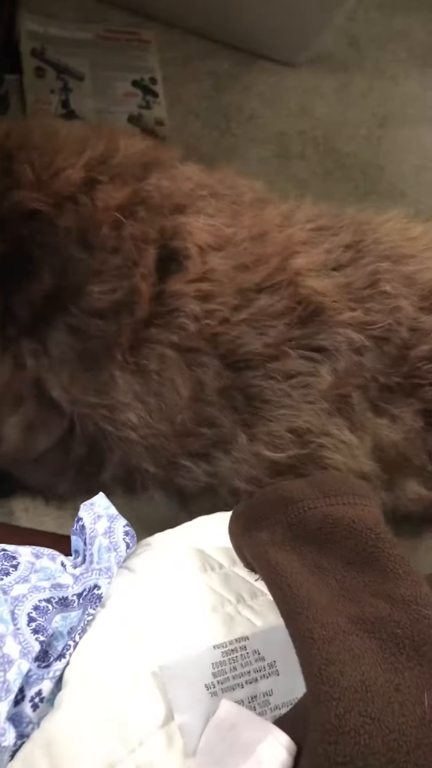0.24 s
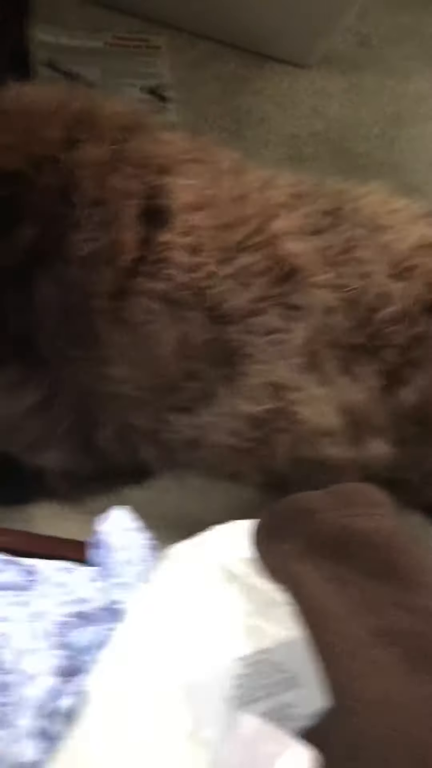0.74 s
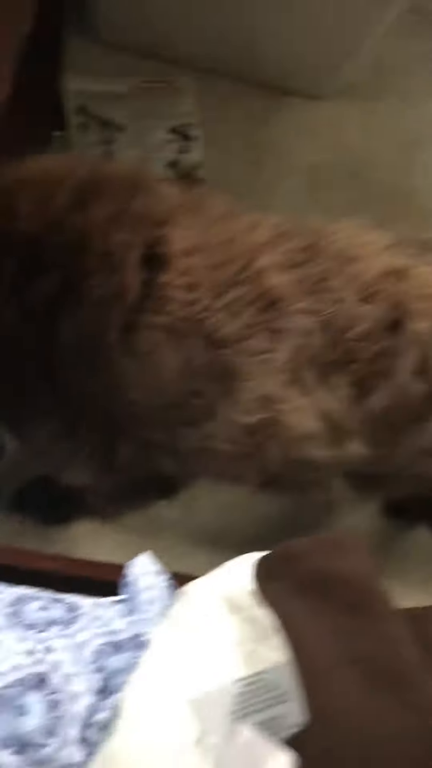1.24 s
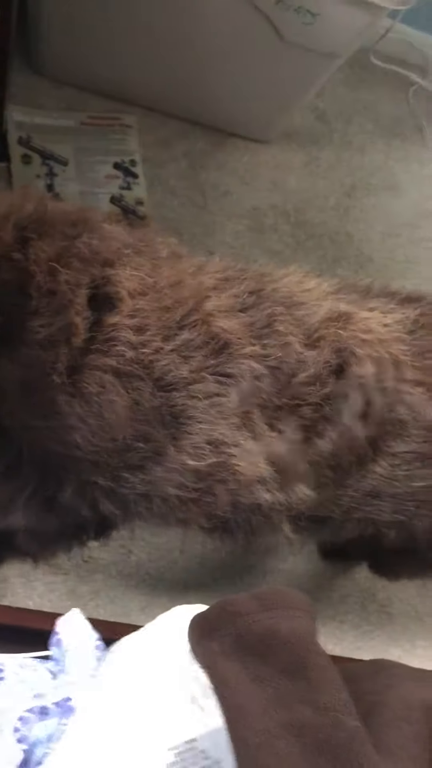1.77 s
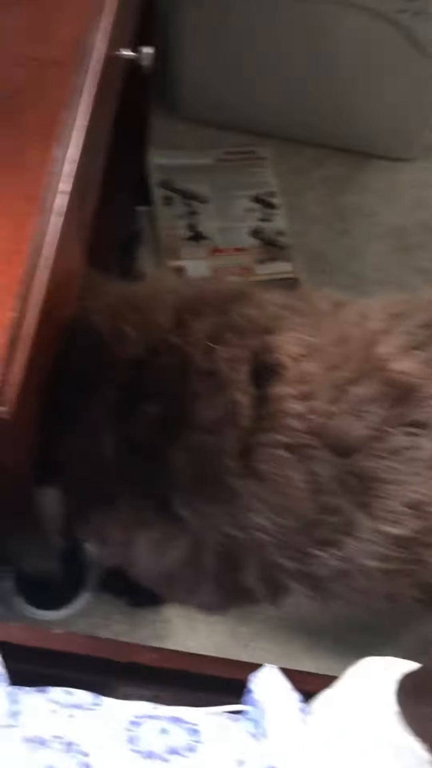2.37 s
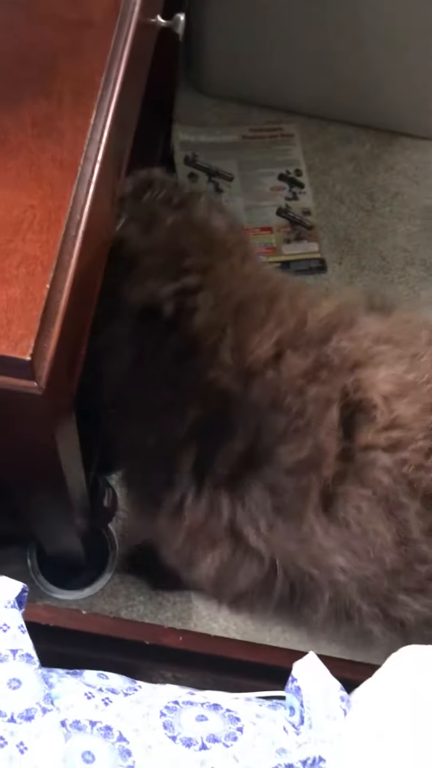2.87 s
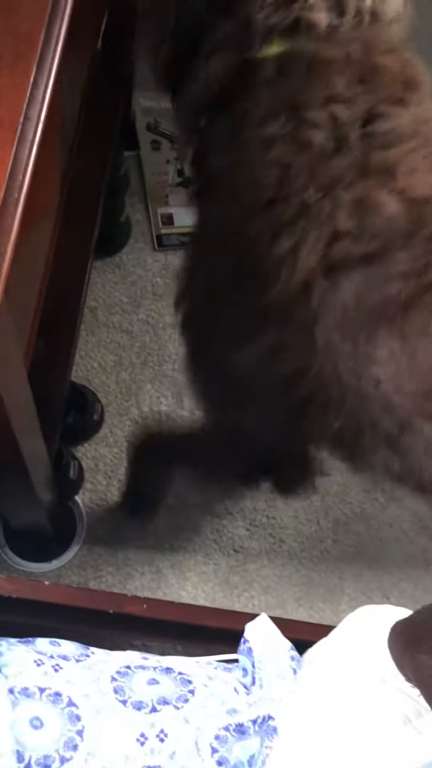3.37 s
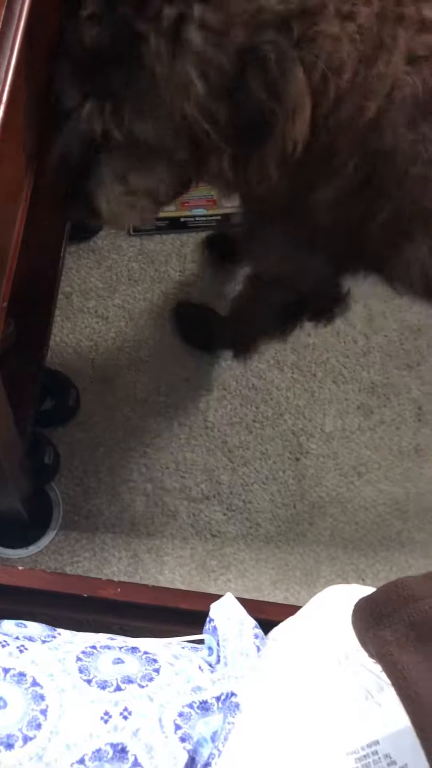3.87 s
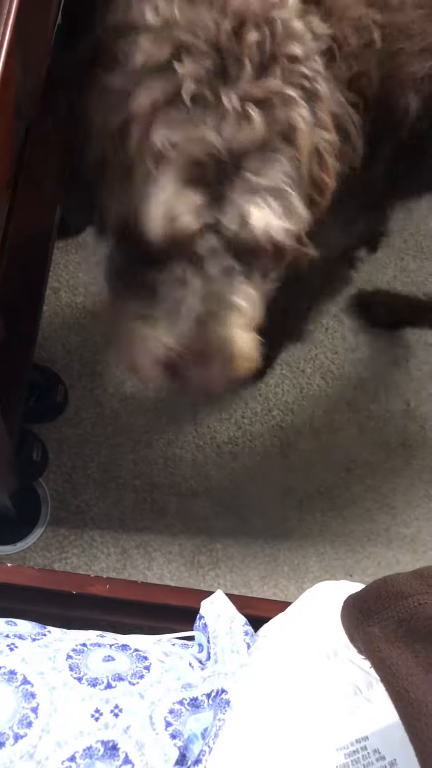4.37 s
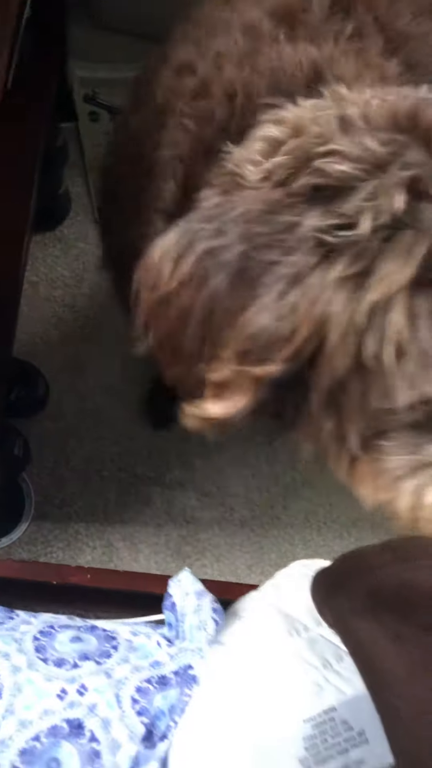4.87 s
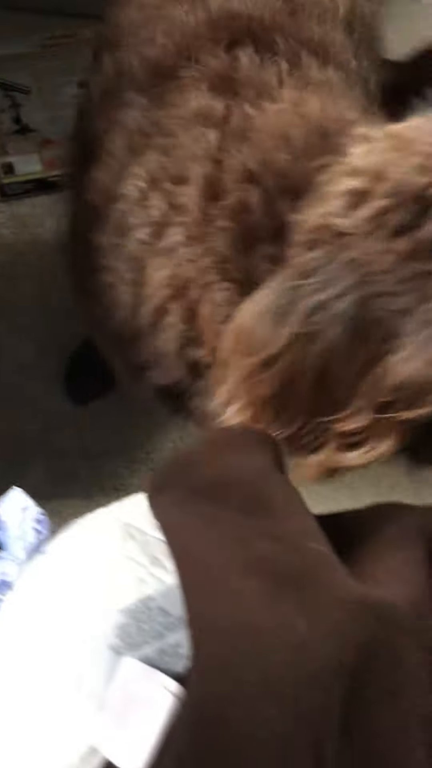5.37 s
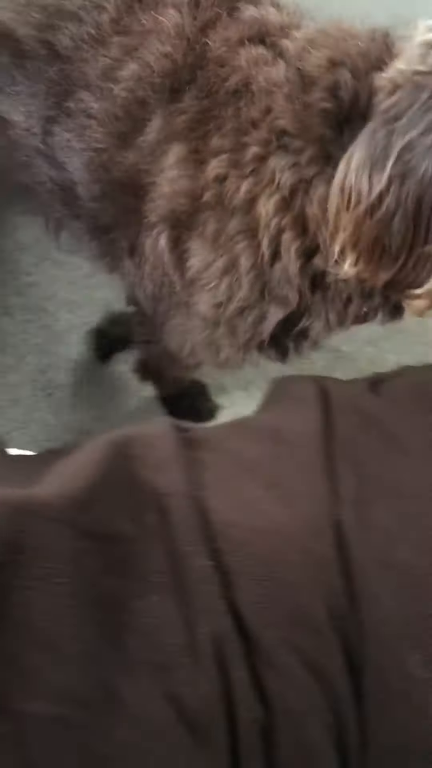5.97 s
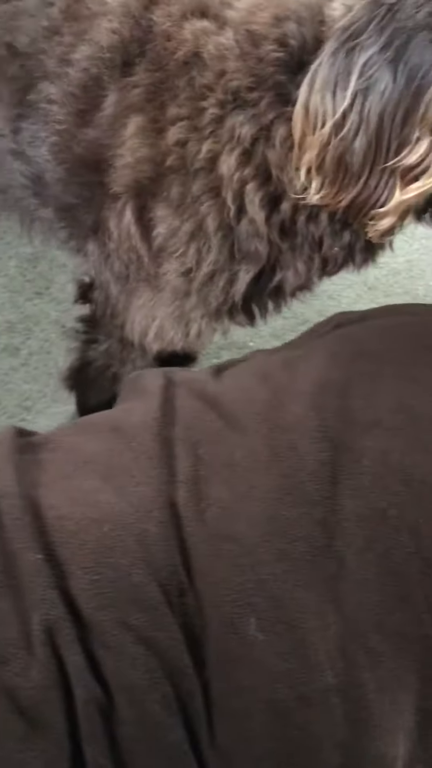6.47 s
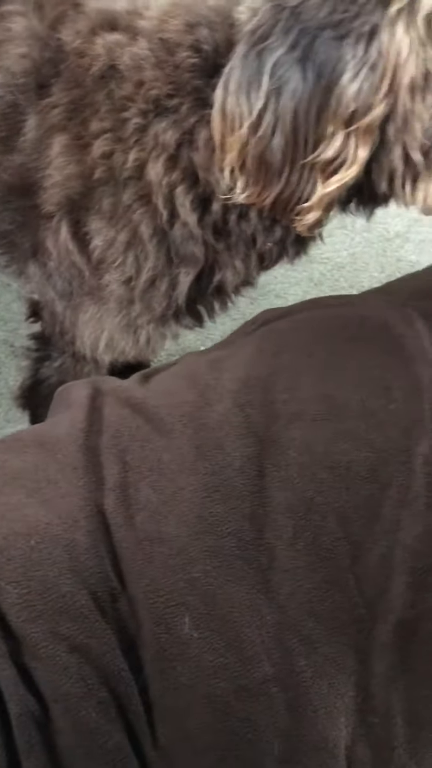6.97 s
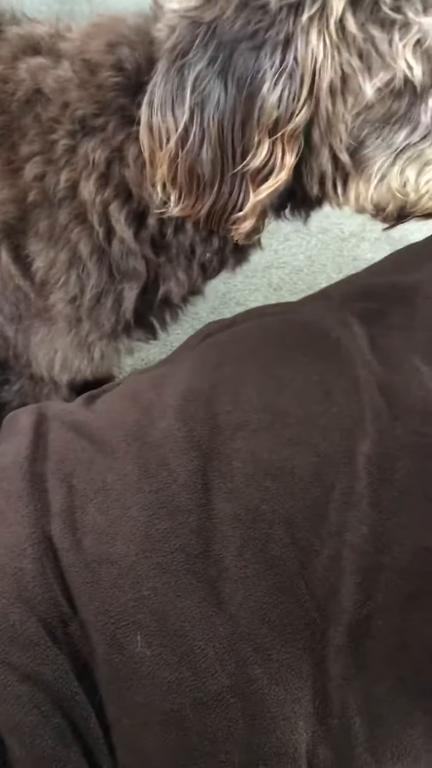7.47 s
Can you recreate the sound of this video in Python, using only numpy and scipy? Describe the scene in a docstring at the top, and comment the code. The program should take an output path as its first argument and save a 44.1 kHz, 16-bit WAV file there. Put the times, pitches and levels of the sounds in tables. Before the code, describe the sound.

A quiet carpeted bedroom with faint still air and a barely audible, wavering low drone; a puppy is close to the microphone. The tail of a thin, high whimper fades by 0.15 s, followed by a soft nose puff. A weak airy whine comes at 0.4-0.6 s, then a puff, a faint sniff and dull paw thuds around 1 s, with lighter ones later. At 2.1-2.5 s a purer whistling whine slides downward. Short whimpers follow at 2.7, 3.1 and 3.5 s, the second a steeply falling yelp, with tiny squeaks, nose puffs and carpet brushing. At 3.94 s a loud, piercing, raspy cry drops quickly into a long trembling whine lasting until 5.7 s, with a low voiced moan swelling beneath until about 5.2 s. A soft shuffle, then a gentler bending whine at 6.0-6.5 s with a sniff and wet mouth ticks. A very faint squeak at 7 s, then quiet.

```python
"""A puppy whines close to the microphone in a quiet carpeted bedroom: thin sliding nasal whistles, a falling yelp,
then a sharp cry that settles into a long whine. Whistles are harmonics on moving pitches, with hiss and rasp
from the same airflow; in the long whine the vocal folds hum a second, lower note under the whistle.
Small nose puffs of shaped noise end the cries, paws step and shuffle on the carpet as damped and swelling
noise, and a faint low drone wavers behind everything."""
import sys
import numpy as np
from scipy import signal
from scipy.fft import rfft, irfft, next_fast_len
from scipy.io import wavfile
from scipy.ndimage import map_coordinates

SR = 44100
rng = np.random.default_rng(int(sys.argv[2]) if len(sys.argv) > 2 else 0)


def int16_out(signal):
    """Quantize to a 16-bit WAV file."""
    q = np.round(np.clip(np.atleast_2d(signal).T, -1, 1) * 32767)
    wavfile.write(sys.argv[1], SR, q.astype(np.int16))


N = 340893
TIME = np.arange(N) / SR


def amp(db):
    """Decibels to gain."""
    return 10 ** (np.asarray(db) / 20)


def unit(x):
    """Scale to rms 1."""
    return x / np.sqrt(np.mean(x ** 2) + 1e-20)


def along(points, hz):
    """Read (frequency_hz, value) points on a log frequency axis."""
    f, v = np.transpose(points)
    return np.interp(np.log(hz + 1), np.log(f + 1), v)


def curves(rows, t):
    """Each column after the time, at the times t."""
    s, *cols = np.transpose(rows)
    return [np.interp(t, s, c) for c in cols]


def wobble(rate, t):
    """A random curve through rate knots a second."""
    knots = rng.standard_normal(int(N * rate / SR) + 4)
    return map_coordinates(knots, [t * rate], mode="nearest")


def filtered(x, response):
    """x times a response of frequency."""
    m = next_fast_len(N + SR // 2)
    return irfft(rfft(x, m) * response(np.fft.rfftfreq(m, 1 / SR)), m)[:N]


def noise(colour):
    """Coloured noise of rms 1."""
    return unit(filtered(rng.standard_normal(N), lambda hz: amp(along(colour, hz))))


def resonance(modes, hz):
    """Summed gain, at the frequencies hz, of resonances whose width is taken at half gain."""
    return sum(amp(db) / (1 + (2 * (hz - centre) / width) ** 2) for centre, width, db in modes)


def resonant_noise(modes, stretch=1):
    """Noise of rms 1 shaped by resonances, whose frequencies are multiplied by stretch."""
    return unit(filtered(rng.standard_normal(N), lambda hz: resonance(modes, hz / stretch)))


def gate(t, start, end, edge=0.0028):
    """Open from start to end, with soft edges."""
    return np.sin(np.pi / 2 * np.clip(np.minimum(t - start, end - t) / edge + .5, 0, 1)) ** 2


def sounding(start, end):
    """The samples that a cry covers, their times, and its gate."""
    opening = gate(TIME, start, end)
    span = np.flatnonzero(opening)
    return span, TIME[span], opening[span]


def swell(start, length):
    """A rounded rise and fall."""
    return np.sin(np.pi * np.clip((TIME - start) / length, 0, 1))


def tone(hz, harmonics):
    """Harmonics (number, rms dB) on a moving pitch."""
    phase = 2 * np.pi * np.cumsum(hz) / SR
    return np.sqrt(2) * sum(amp(db) * np.sin(k * phase) * (k * hz < SR / 2) for k, db in harmonics)


def swishes(rows, air):
    """Short bell-shaped swells of a noise, made grainy."""
    level = sum(amp(db) * np.exp(-.5 * ((TIME - s) / width) ** 2) for s, width, db in rows)
    grain = amp(2.5 * wobble(250, TIME))
    return level * unit(air * grain)


def taps(rows, decay_s, modes):
    """Small contacts that start sharply and are damped at once."""
    blows = sum(amp(db) * (TIME >= s) * np.exp(-np.abs(TIME - s) / decay_s) for s, db in rows)
    return blows * resonant_noise(modes)


# the low drone's course, about which it wavers: time_s, pitch_hz, level_db
DRONE = [(0, 116, -72), (1.3, 121, -58), (1.7, 121, -58), (2, 118, -69), (3.5, 100, -65), (6.7, 123, -60),
         (7.3, 128, -67)]
# the low rumble's course: time_s, level_db
RUMBLE_LEVEL = [(2.4, -88), (3.4, -60), (4.4, -65.5), (6.5, -59.5), (7.7, -70.5)]
# colours of the rumble and of the still air: frequency_hz, relative_db
RUMBLE = [(25, -10), (75, 0.5), (220, -20), (1000, -72.5)]
QUIET = [(20, -24.5), (59, -8.5), (130, -13.5), (156, -19.5), (1050, -33), (15500, -47)]


def background(floor_db=-64):
    """Still room air as steady coloured noise, with a low wavering drone and a soft rumble."""
    hz, db = curves(DRONE, TIME)
    hz = hz * (1 + .012 * wobble(4, TIME))
    drone = tone(hz, [(1, db + 1.5 * wobble(2.5, TIME))])
    rumble = amp(curves(RUMBLE_LEVEL, TIME)[0]) * noise(RUMBLE)
    return drone + rumble + amp(floor_db) * noise(QUIET)


# how the snout colours the whistle's overtones: frequency_hz, gain_db
SNOUT = [(6400, -1.5), (7400, -10), (8500, -11.5), (11700, -9.5), (14000, -23)]
# resonances of the nasal passages: frequency_hz, width_hz, gain_db
NASAL = [(208.7, 250, 4), (1048, 750, 1), (2236, 340, -3), (3290, 830, 7), (4210, 402, 3.5),
         (5690, 1830, 2), (9220, 1410, -5), (12080, 2300, -5)]
# resonances of the throat, before any stretch: frequency_hz, width_hz, gain_db
THROAT = [(600, 160, -5), (1166, 149, 0.5), (1618, 140, 1.5), (2118, 198.3, -9), (2430, 189.4, -7),
          (13100, 3630, -16)]
# spread of the slow and fast unsteadiness of pitch (shares), and of level (dB)
RIPPLE, JITTER, FLUTTER_DB = .0035, 0.00271, 1.4
PURE_FLOW_DB = -15  # a pure whistle needs less air than one rich in overtones


def whistle(cries, hiss_db, rasp_db=-35, fades_db=0, stretch=1, lag_s=0.021):
    """Air whistles in the narrowed airway with trembling pitch and strength; the same flow hisses and rasps.
    A less open mouth (stretch under 1) lowers the throat's resonances."""
    def flutter(t):
        """Each harmonic trembles on its own, and fades as if by echoes where fades_db is set."""
        return FLUTTER_DB * wobble(140, t) - fades_db * np.maximum(wobble(30, t), 0) ** 2

    out, flow = np.zeros(N), np.zeros(N)
    for span, opening, hz, (first, second, third) in cries:
        t = TIME[span]
        hz = hz * (1 + RIPPLE * wobble(30, t) + JITTER * wobble(500, t))
        # the fourth and fifth harmonics follow the third through the snout
        highest = [third + along(SNOUT, k * hz) - along(SNOUT, 3 * hz) for k in (4, 5)]
        levels = [first, second, third] + highest
        out[span] += opening * tone(hz, [(k, db + flutter(t)) for k, db in enumerate(levels, 1)])
        flow[span] += opening * (amp(first + PURE_FLOW_DB) + amp(second) + amp(third))
    step = 1 / (lag_s * SR)
    flow = signal.lfilter([step], [1, step - 1], flow)  # turbulence builds and dies just after the tone
    eddies = amp(2 * wobble(90, TIME))
    hiss = amp(hiss_db) * np.sqrt(flow) * resonant_noise(NASAL)  # grows more slowly than the flow
    rasp = amp(rasp_db) * flow * resonant_noise(THROAT, stretch)  # stands out in hard cries
    return out + eddies * (hiss + rasp)


def held(rows):
    """A held cry follows its own course of pitch and strength."""
    span, t, opening = sounding(rows[0][0], rows[-1][0])
    hz, *levels = curves(rows, t)
    return span, opening, hz, levels


SAG, SAG_S = 0.038, 0.011  # share by which the pitch drops as the air runs out, and its time constant
FALTER, FALTER_S = 0.0296, .025  # spread of pitch unsteadiness at the end (share), and its time constant
ATTACK_DB, ATTACK_S = 4, 0.011  # depth and time constant of the swell at the start
RELEASE_DB, RELEASE_S = 9.5, 0.0049  # and of the fall at the end
FIRST_SWING_S = 0.058  # from the start to the first level swell (or dip, where the swing is negative)
THIRD_FADE_DB = -12.5  # change of the third harmonic over a cry: the whistle dulls


def whimper(start, length, first_hz, last_hz, arch_hz, db, fade_db, swing_rate, swing_db, second_db, third_db):
    """A short cry slides along an arch, then sags and falters, while its level swells and dips as if by echoes."""
    span, t, opening = sounding(start, start + length)
    age, left = t - start, start + length - t
    u = age / length
    hz = first_hz + (last_hz - first_hz) * u + arch_hz * (1 - (2 * u - 1) ** 2)
    falter = FALTER * np.exp(-left / FALTER_S) * wobble(400, TIME[:len(t)])
    hz = hz * (1 - SAG * np.exp(-left / SAG_S) + falter)
    edges = -ATTACK_DB * np.exp(-age / ATTACK_S) - RELEASE_DB * np.exp(-left / RELEASE_S)
    swing = swing_db * np.cos(2 * np.pi * swing_rate * (age - FIRST_SWING_S))
    first = db + fade_db * u + swing
    second = second_db + along(SNOUT, 2 * hz)
    third = third_db + THIRD_FADE_DB * (u - .5)
    return span, opening, hz, [edges + level for level in (first, second, third)]


# short cries, before edges, sag and falter: start_s, length_s, first_pitch_hz, last_pitch_hz, pitch_arch_hz,
# level_db, change_over_cry_db, level_swing_rate_hz, level_swing_db, second_harmonic_db (before the snout),
# third_harmonic_db (halfway)
WHIMPERS = [(-.04, 0.18, 3068, 3050, 14, -47.5, -15.5, 8.2, 6, -55.5, -69.5),
            (2.744, 0.15, 3567, 3100, 263.5, -43, -4, 13.7, -5, -66.5, -66.5),
            (3.137, 0.15, 4308, 2687, 21.5, -32, -4.5, 25.2, 5.5, -51.5, -58),
            (3.508, 0.225, 3722, 3067, -62.5, -36, -9, 4.7, 4.5, -53, -62.5),
            (7.005, 0.12, 3780, 4070, -100, -63.5, -3.5, 8.3, -1, -68, -89)]


def whimpers():
    """Short sliding cries from a less open mouth, the falling yelp among them."""
    return whistle([whimper(*row) for row in WHIMPERS], hiss_db=-41, rasp_db=-19, stretch=.9)


# puffs through the nose, then brighter sniffs: peak_s, width_s (standard deviation), level_db
PUFFS = [(.172, 0.021, -55), (.585, 0.025, -61), (3.283, 0.019, -52), (3.73, 0.013, -53),
         (5.735, 0.033, -65.5), (6.553, 0.018, -63)]
SNIFFS = [(1.085, 0.03, -70), (6.25, 0.026, -57)]
# colour of the puffs: frequency_hz, relative_db
NOSE = [(150, -3), (450, 7.5), (1300, 2), (3000, -4.5), (15000, -35.5)]


def nose_breaths():
    """Air leaves the nose in soft puffs; sniffs ring in the nasal passages."""
    return swishes(PUFFS, noise(NOSE)) + swishes(SNIFFS, resonant_noise(NASAL))


# held soft whines: time_s, pitch_hz, first_harmonic_db, second_harmonic_db, third_harmonic_db
FIRST_WHINE = [(.366, 3350, -58, -58, -66), (.428, 3180, -53, -59.5, -64), (.515, 3164, -49, -49.5, -73),
               (.582, 2970, -66, -55, -79)]
LAST_WHINE = [(6.032, 3486, -52, -55.5, -83.5), (6.09, 3460, -52, -55, -64), (6.128, 3264, -43, -57, -57.5),
              (6.168, 3186, -49.5, -57, -66.5), (6.225, 3295, -48, -59, -60),
              (6.32, 3170, -48.5, -60.5, -65), (6.5, 3146, -51, -62.5, -65.5), (6.53, 2870, -61, -60, -85)]


def soft_whines():
    """The first and last held whines, whistled softly on bending pitches."""
    return whistle([held(FIRST_WHINE), held(LAST_WHINE)], hiss_db=-37.5, rasp_db=-25.5)


# paws land on the carpet: time_s, level_db
PAWFALLS = [(0.97, -57), (1.012, -52), (1.028, -55), (1.338, -60), (1.792, -60.5)]
# the thud's resonance: frequency_hz, width_hz, gain_db
THUD = [(560, 1060, 0)]


def pawfalls():
    """Paws land on carpet as dull thuds of quickly damped noise."""
    return taps(PAWFALLS, 0.0086, THUD)


# a purer held whine: time_s, pitch_hz, first_harmonic_db, second_harmonic_db, third_harmonic_db
SECOND_WHINE = [(2.058, 3420, -59.5, -70, -70), (2.098, 3654, -35.5, -73, -53.5),
                (2.21, 3565, -57.5, -81, -64), (2.295, 3533, -41, -79, -57), (2.355, 3360, -52, -65, -68.5),
                (2.447, 3240, -44.5, -67, -62), (2.49, 3030, -64, -62, -80)]


def pure_whine():
    """A held whistle with weak overtones and little hiss."""
    return whistle([held(SECOND_WHINE)], hiss_db=-42.5)


# squeaks of the airway: start_s, length_s, nominal_pitch_hz (main partial at 0.98 of it), level_db
SQUEAKS = [(2.076, 0.025, 5470, -63), (3.11, 0.036, 9700, -49.5), (3.472, 0.053, 9350, -52.5),
           (3.935, 0.015, 9720, -48), (6.02, .013, 9830, -56.5)]
# lower partials as a squeak starts and breaks: share_of_nominal_pitch, relative_db (for a squeak of split_s)
SQUEAK_SPLIT = [(0.399, -4.5), (.6, 2)]


def squeaks(jitter=0.004, split_dip_db=15, split_s=0.036):
    """Brief high notes as the whistle locks on to its pitch; longer ones split more into lower partials."""
    out = np.zeros(N)
    for s, length, hz, db in SQUEAKS:
        span, t, opening = sounding(s, s + length)
        steady = np.abs(np.sin(np.pi * (t - s) / length))
        pitch = hz * (1 + jitter * (2 - steady) ** 2 * wobble(390, t))  # ragged as it starts and breaks
        split_db = db + 20 * np.log10(length / split_s) - split_dip_db * steady
        lower = [(share, split_db + part_db) for share, part_db in SQUEAK_SPLIT]
        out[span] += opening * tone(pitch, [(0.98, db)] + lower)
    return out


# paws and fur brush the carpet, and the puppy draws breath in (near 3.87 and 5.89 s): peak_s, width_s (standard
# deviation), level_db
SHUFFLES = [(2.49, 0.015, -61.5), (2.62, 0.032, -67), (3.02, 0.041, -71), (3.43, 0.24, -65),
            (3.87, 0.034, -59.5), (5.89, 0.027, -60.5)]
# colour of the brushing: frequency_hz, relative_db
CARPET = [(250, -9), (620, 0.5), (1300, -3), (15000, -23)]


def shuffles():
    """Paws and fur brush the carpet, and the puppy draws breath in, in grainy swells of noise."""
    return swishes(SHUFFLES, noise(CARPET))


# the sharp cry: time_s, pitch_hz, first_harmonic_db, second_harmonic_db, third_harmonic_db
SHARP_CRY = [(3.937, 4550, -39.5, -61, -54.5), (3.956, 4542, -16, -49.5, -43),
             (3.983, 4440, -14.5, -27.5, -40), (3.994, 4310, -32, -40.5, -51.5),
             (4.009, 4030, -18.5, -43.5, -54), (4.025, 3710, -23, -51, -59),
             (4.051, 3393, -29.5, -52.5, -70), (4.091, 3194, -40, -58, -68), (4.135, 3240, -54, -52, -73)]


def sharp_cry():
    """A hard, falling whistle whose strong flow rasps in the throat."""
    return whistle([held(SHARP_CRY)], hiss_db=-38.5, rasp_db=-14.5)


# swells of the voiced note under the whistle: start_s, length_s, level_db
MOANS = [(3.966, 0.023, -36), (4.288, 0.064, -28), (4.42, 0.086, -31), (4.478, 0.12, -31.5),
         (4.607, 0.096, -31.5), (4.686, 0.066, -37), (4.91, 0.11, -30.5), (5.011, 0.12, -29),
         (5.099, 0.12, -29.5)]
# its pitch: time_s, pitch_hz
MOAN_PITCH = [(3.98, 1210), (4.28, 876), (4.308, 780), (4.355, 721), (4.42, 758), (4.5, 680), (4.645, 654),
              (4.97, 634.6), (5.1, 601.5), (5.21, 589)]
# sidebands of the whistle, relative to the voiced note: frequency_hz, gain_db
SIDEBANDS = [(1800, -39), (2400, -30), (3700, -20.5), (4250, -18), (4900, -29.5), (5600, -27.5),
             (14000, -37.5)]
MOAN_OVERTONES_DB = -25.5  # before the throat's resonances pick among them


def moan(jitter=0.0029, waver_db=3):
    """The vocal folds join in with rounded swells of an almost pure note. They also pulse the airflow,
    which puts sidebands one and two steps of their pitch away from each harmonic of the whistle."""
    def waver():
        """Every partial flickers on its own."""
        return waver_db * wobble(70, TIME)

    hz = curves(MOAN_PITCH, TIME)[0]
    hz = hz * (1 + 2 * RIPPLE * wobble(30, TIME) + jitter * wobble(200, TIME))
    strength = np.sqrt(sum((amp(db) * swell(start, length)) ** 2 for start, length, db in MOANS))
    throat_db = [20 * np.log10(resonance(THROAT, k * hz)) for k in range(2, 5)]
    overtones = [(k, MOAN_OVERTONES_DB + db + waver()) for k, db in enumerate(throat_db, 2)]
    note = tone(hz, [(1, 0)] + overtones)
    during_whine = gate(TIME, LONG_WHINE[0][0], LONG_WHINE[-1][0])
    pulsing = strength * tone(hz, [(1, waver()), (2, waver())]) * during_whine
    jet_hz = curves(LONG_WHINE, TIME)[0] * (1 + .006 * wobble(400, TIME))
    jet = unit(tone(jet_hz, [(k, waver()) for k in range(1, 5)]))
    sidebands = filtered(pulsing * jet, lambda f: amp(along(SIDEBANDS, f)))
    return strength * note, sidebands


def undertone(start=4.125, length=0.43, db=-57, share=0.4005, jitter=0.037):
    """A faint husky line slides along below the whistle, at a share of its pitch, early in the long whine."""
    hz = share * curves(LONG_WHINE, TIME)[0] * (1 + jitter * wobble(400, TIME))
    return swell(start, length) * tone(hz, [(1, db + 2 * wobble(120, TIME))])


# the long whine: time_s, pitch_hz, first_harmonic_db, second_harmonic_db, third_harmonic_db
LONG_WHINE = [(4.135, 3284, -50, -56, -66), (4.206, 3237, -49.5, -48, -54.5), (4.269, 3095, -36, -38, -49),
              (4.318, 2944, -56.5, -41.5, -51.5), (4.355, 2872, -48, -40.5, -45.5),
              (4.484, 2963, -51.5, -40, -54), (4.588, 2960, -58.5, -46.5, -61),
              (4.885, 3160, -47, -47.5, -62.5), (4.929, 3202, -42.5, -61.5, -63.5),
              (5.211, 3053, -45.5, -51.5, -68), (5.303, 3120, -48, -59, -61),
              (5.695, 3143, -43.5, -62, -65.5), (5.719, 3000, -68, -62, -84)]


def long_whine():
    """A long held whistle whose harmonics fade unevenly, as if room echoes interfered."""
    return whistle([held(LONG_WHINE)], hiss_db=-36.0, fades_db=4)


# small wet ticks of the mouth: time_s, level_db
TICKS = [(6.03, -52.5), (6.556, -56.5)]


def mouth_ticks():
    """Wet contacts in the mouth, damped at once and coloured by the nasal passages."""
    return taps(TICKS, .004, NASAL)


# decay of the bedroom: frequency_hz, t60_s
ROOM = [(3500, 0.36), (12000, 0.057)]


def room(x, early_db, tail_db):
    """Nearby furniture echoes beat against the sliding whistles; a short soft tail follows."""
    hz, t, z = signal.stft(rng.standard_normal(SR // 2), SR, nperseg=256)
    decay = amp(-60 * t / along(ROOM, hz)[:, None])
    tail = signal.istft(z * decay, SR, nperseg=256)[1]
    response = amp(tail_db) * np.pad(tail / np.linalg.norm(tail), (SR // 200, 0))  # tail starts after 5 ms
    delays_s = rng.uniform(0.0016, 0.014, size=8)
    echoes = rng.choice([-1, 1], size=8) / np.sqrt(len(delays_s))
    response[(delays_s * SR).astype(int)] += amp(early_db) * echoes
    return x + signal.fftconvolve(x, response)[:N]


def scene():
    """The puppy's cries and movements in the room; the low note arrives almost dry."""
    folds, sidebands = moan()
    short_cries = whimpers() + pure_whine() + squeaks()
    long_cries = sharp_cry() + long_whine() + undertone() + sidebands + soft_whines()
    movements = nose_breaths() + mouth_ticks() + shuffles() + pawfalls()
    short = room(short_cries, early_db=-8.5, tail_db=-13.5)
    long = room(long_cries + movements, early_db=-11.0, tail_db=-16.5)
    low = room(folds, early_db=-32, tail_db=-23)
    return (short + long + low + background())[None]


TOP_HZ = 15850  # band limit of the microphone chain


def record(dry):
    """The microphone chain passes only what lies below its band limit."""
    return filtered(dry[0], lambda hz: hz < TOP_HZ)[None]


dry = scene()
out = record(dry)
int16_out(out)
```